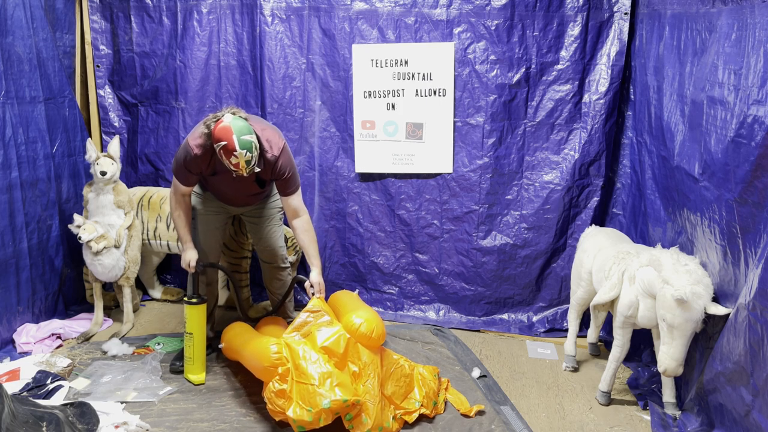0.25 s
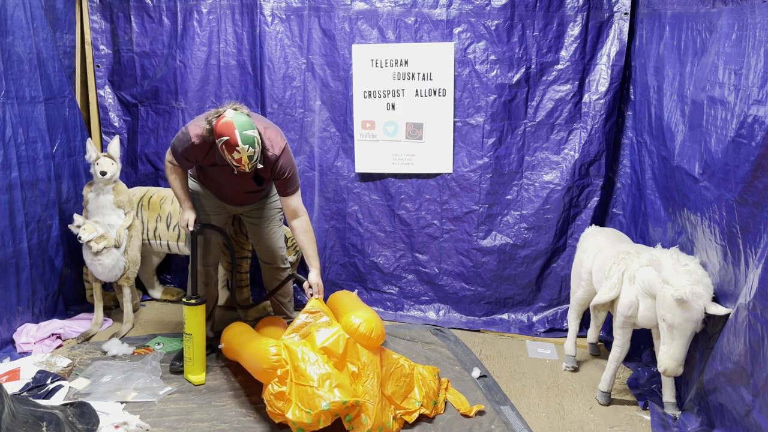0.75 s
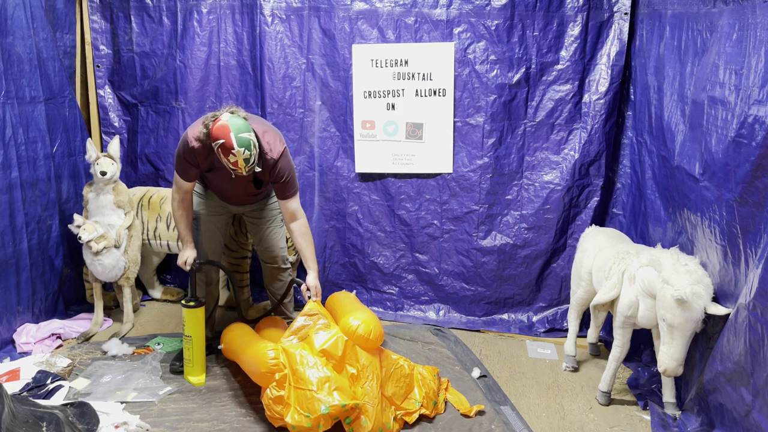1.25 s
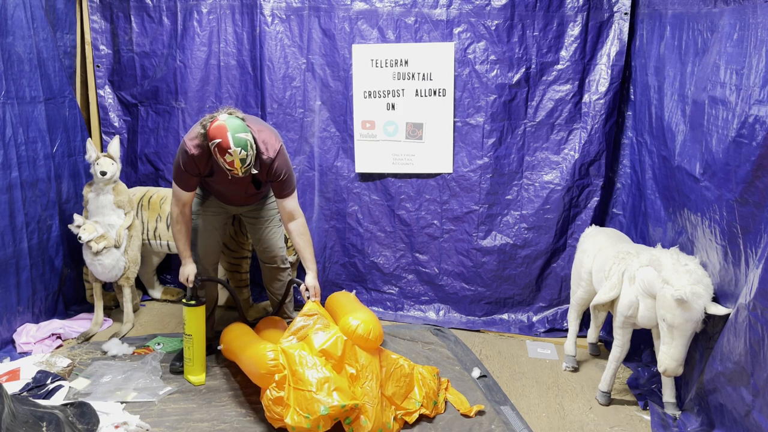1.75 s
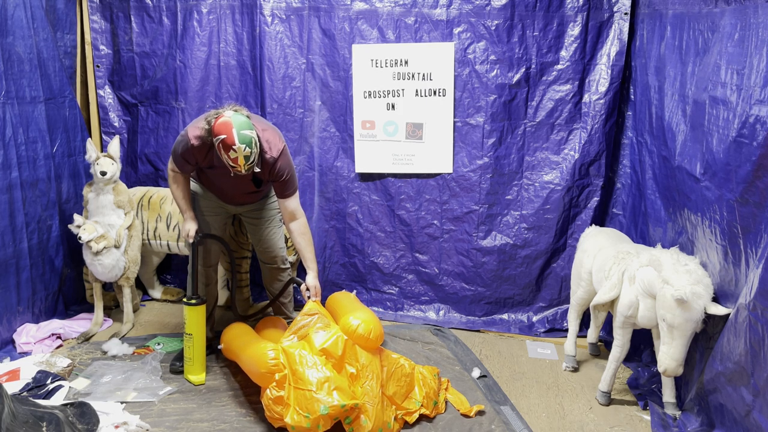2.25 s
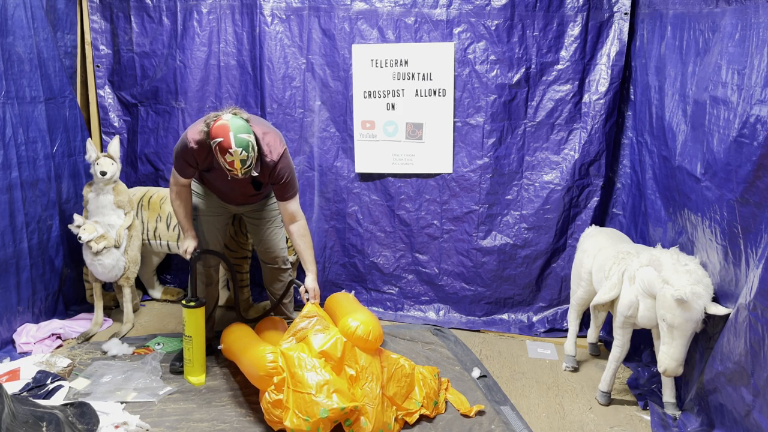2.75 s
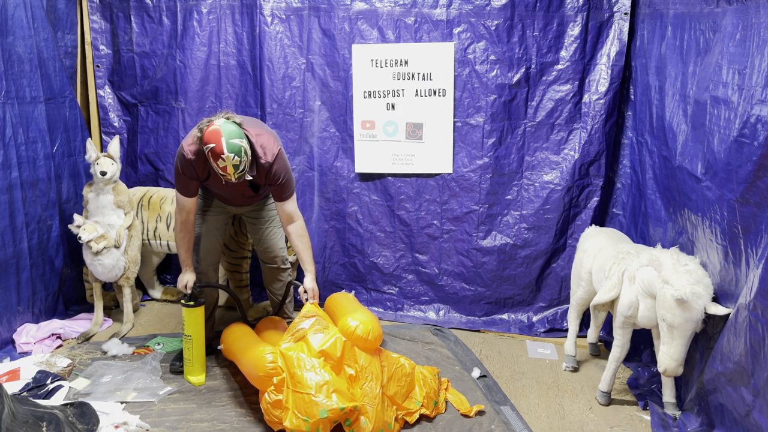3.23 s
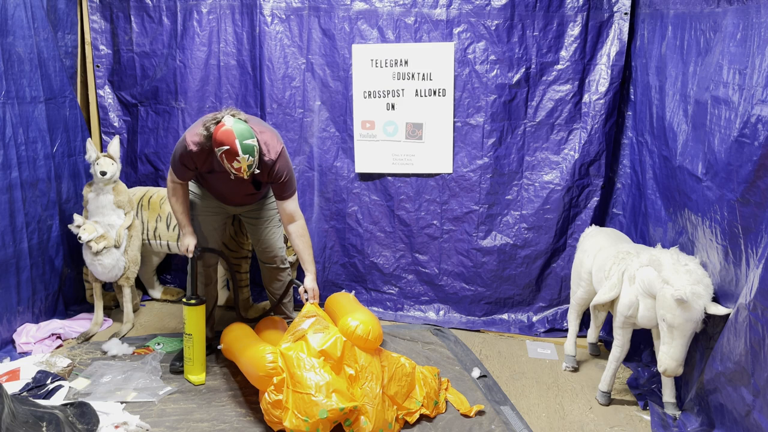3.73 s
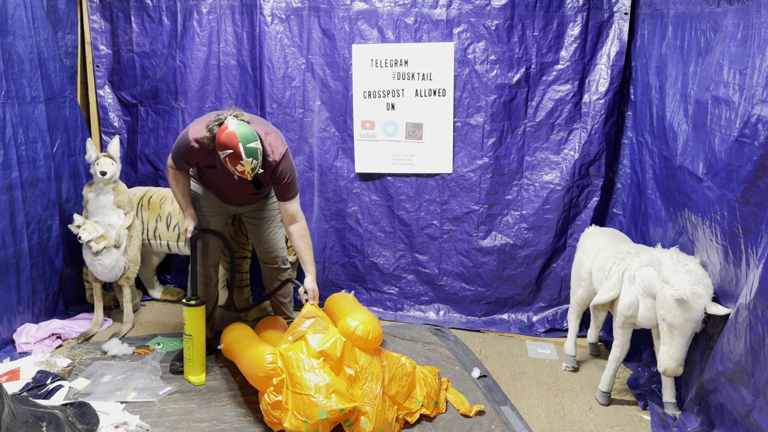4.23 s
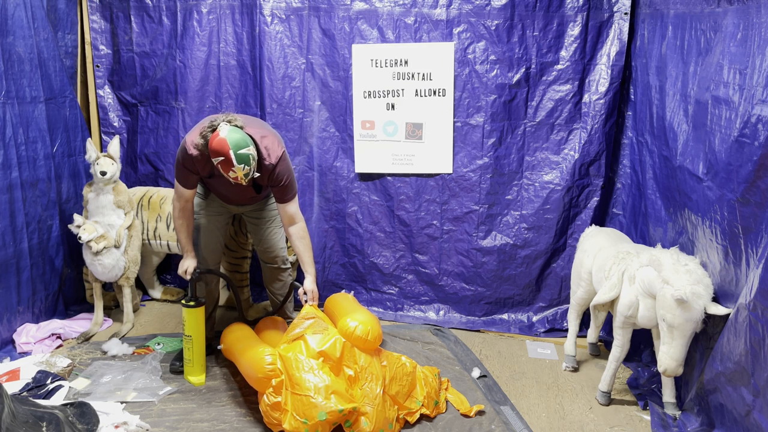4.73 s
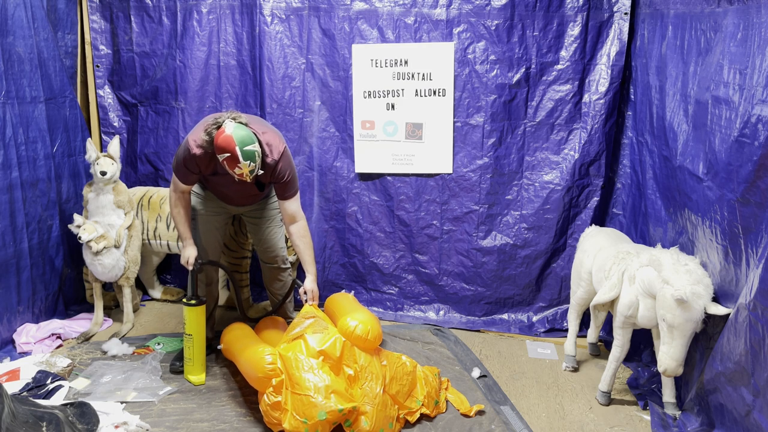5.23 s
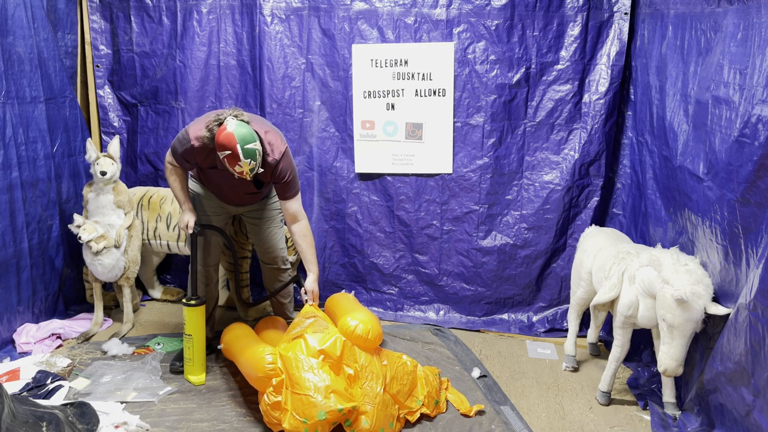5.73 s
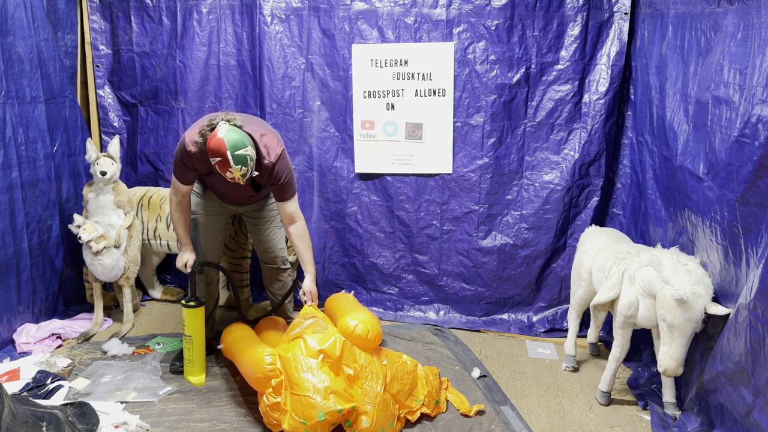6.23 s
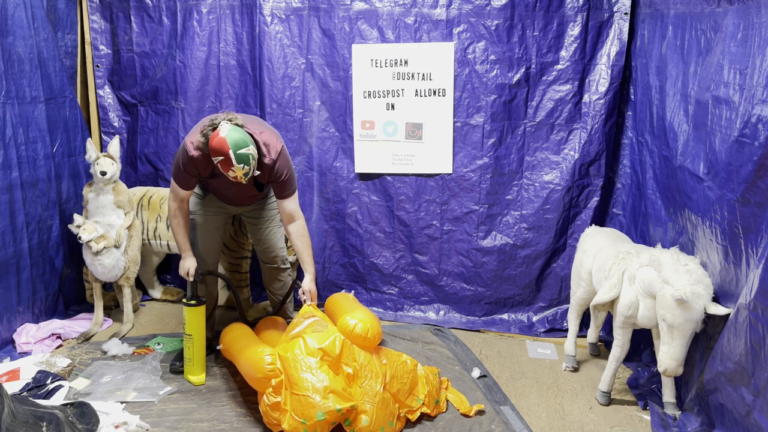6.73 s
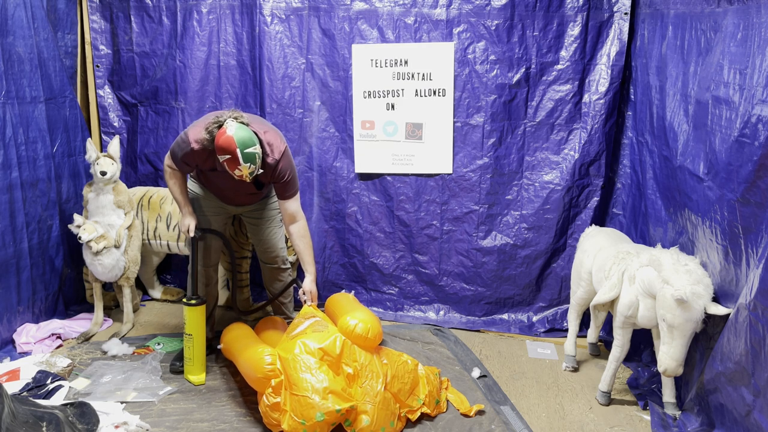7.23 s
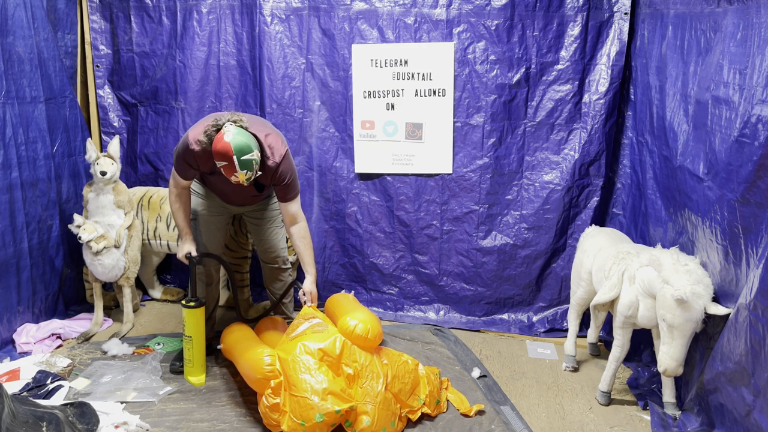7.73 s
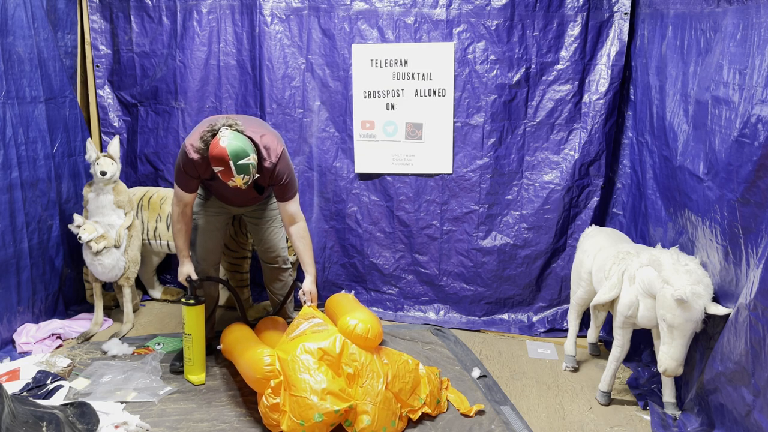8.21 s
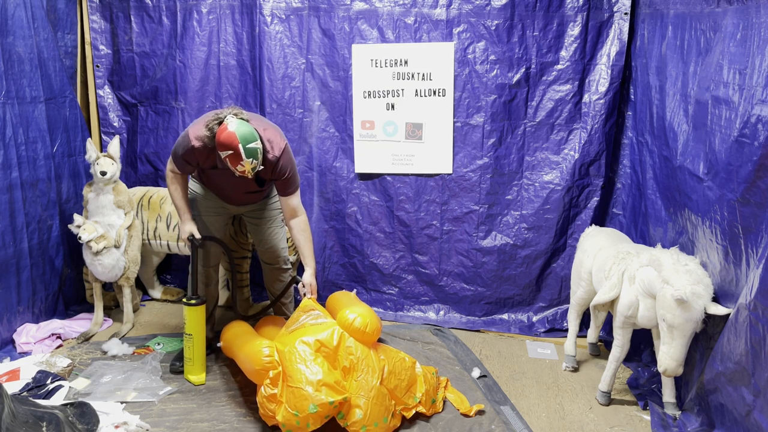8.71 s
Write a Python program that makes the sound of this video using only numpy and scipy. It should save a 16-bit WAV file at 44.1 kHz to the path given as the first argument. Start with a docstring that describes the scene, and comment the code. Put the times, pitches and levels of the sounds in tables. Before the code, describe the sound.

A hand pump works in steady strokes, loud airy hisses on the pulls alternating with softer puffs on the pushes, with one dull bottom knock.

```python
"""A double-action hand pump fills a vinyl inflatable in a space hung with tarpaulin.
First a push dies away; then pulls and pushes take turns, and the sound ends during the sixth pull.
Air noise hisses through the valves and rings in rod and hose; the barrel's tone glides down on pulls, up on pushes.
As the handle turns at the top there is a soft bump, and a valve flap flutters as the push starts.
Near the end of the second full push the piston knocks on the bottom. Low rumble and faint hiss lie behind it all."""
import sys
import numpy as np
from scipy import signal
from scipy.fft import rfft, irfft, next_fast_len
from scipy.io import wavfile
from scipy.ndimage import uniform_filter1d

SR = 44100
rng = np.random.default_rng(int(sys.argv[2]) if len(sys.argv) > 2 else 0)


def store_pcm(level_fs):
    """Save levels as 16-bit WAV."""
    pcm = np.round(np.clip(level_fs, -1, 1) * 32767).astype(np.int16)
    wavfile.write(sys.argv[1], SR, np.atleast_2d(pcm).T)


N = 395577
TIME = np.arange(N) / SR
PADDED = next_fast_len(N + SR)  # room for echoes to ring out
HZ = np.maximum(np.arange(PADDED // 2 + 1) * SR / PADDED, 1)


# Strokes of the pump handle; the first push is already dying away at the start.
# Each row: start in seconds, length in seconds, strength of the air jet in dB before shaping and mixing,
# time to full speed in seconds, loss as the arm tires in dB per second.
PULL_STROKES = [(0.109, .83, -20.7, .18, 4), (1.753, .825, -20.9, .185, 6), (3.415, .86, -18.6, .21, 9.5),
                (5.083, .8, -18.8, .28, 9.7), (6.7, .8, -19.6, .22, 9.2), (8.307, .83, -18.7, .26, 11.5)]
PUSH_STROKES = [(-.76, .79, -28, .02, 6), (0.959, .77, -25.9, .17, 10.5), (2.6, .785, -28.6, .01, 4.3),
                (4.296, .76, -27.8, .01, 7.3), (5.888, .78, -27.3, .01, 10),
                (7.527, .695, -27.4, .015, 4.8)]
VALVE_S = .01  # a valve takes this long to open or shut


def flow(strokes, opening_db, brake_s, brake_db):
    """Jet strength: the valve opens, the piston gathers speed, the arm tires and brakes, the valve shuts."""
    strength = np.zeros(N)
    opening = from_db(opening_db)
    for start, length, db, attack_s, tiring_db_per_s in strokes:
        age = np.maximum(TIME - start, 0)
        inside = np.minimum(TIME - start, start + length - TIME)
        valve = np.clip(inside / VALVE_S + .5, 0, 1)
        gathering = np.sin(np.pi / 2 * np.minimum(age / attack_s, 1))
        speed = opening + (1 - opening) * gathering
        braking = np.clip(1 + (age - length) / brake_s, 0, 1) ** 2  # ever harder
        level_db = db - tiring_db_per_s * age - brake_db * braking
        strength += valve * speed * from_db(level_db)
    return strength


def piston_height(pull_ease, push_ease):
    """0 at the bottom, 1 at the top; each stroke starts briskly and slows towards its end."""
    def travel(strokes, ease):
        """Count the strokes done so far, including the part of the present one."""
        done = np.zeros(N)
        for start, length, *_ in strokes:
            progress = np.clip((TIME - start) / length, 0, 1)
            done += 1 - (1 - progress) ** ease
        return done

    return 1 + travel(PULL_STROKES, pull_ease) - travel(PUSH_STROKES, push_ease)


def barrel(x, height, bottom_hz, top_hz, echo):
    """Sound bounces between piston and end cap, so its comb of resonances slides with the piston."""
    bottom_trip, top_trip = SR / bottom_hz, SR / top_hz  # round trips in samples
    trip = bottom_trip + (top_trip - bottom_trip) * height
    at = np.arange(N)
    band = butter(x, [1400, 5200], "band", order=1)
    out = x
    for bounce in (1, 2):
        out = out + echo ** bounce * np.interp(at - bounce * trip, at, band)
    return out


# Fixed resonances of hose and rod.
# Each row: frequency in Hz, width in Hz, lift in dB (overlapping lifts add up).
PIPE_RESONANCES = [(64, 24, 15), (130, 24, 5), (185, 18, 3), (320, 60, 5), (590, 80, 4.5), (829, 70, 7),
                   (1119, 90, 5.5), (1428, 40, 4.5), (1570, 130, 4.5), (1970, 80, 6), (2405, 70, 5.5),
                   (2635, 55, 3.5), (2810, 130, 3.5), (3020, 120, 6), (3360, 130, 6.5), (3773, 130, 7),
                   (4160, 140, 5.5), (4556, 160, 7), (4925, 160, 5.5), (5250, 120, 5), (5600, 180, 6),
                   (5900, 200, 3), (6222, 76, 3.5), (6480, 130, 3.5), (6784, 128, 3), (7437, 190, 7.5),
                   (7832, 190, 6.5), (8213, 156, 5.5), (9085, 190, 7.5), (9880, 200, 7)]


def turbulence(height):
    """Noise from the valves rings in barrel, rod and hose."""
    noise = butter(rng.standard_normal(N), 43, "high")
    jet = barrel(noise, height, bottom_hz=711, top_hz=474, echo=.2)
    pipe_db = sum(db / (1 + (2 * (HZ - hz) / width) ** 2) for hz, width, db in PIPE_RESONANCES)
    return coloured(jet, from_db(pipe_db))


# Tone colour of the valve hiss on the pull and on the push; only the shape counts.
# Each row: frequency in Hz, relative strength per Hz in dB.
PULL_HISS_COLOUR = [(150, -18.5), (450, -17), (1000, -14.5), (1800, -8.5), (2800, 1.5), (3900, -5),
                    (5600, -3.5), (6600, -3), (7400, -15.5), (8600, -17), (10000, -14.5), (11300, -7.5),
                    (11900, -53), (14000, -19)]
PUSH_HISS_COLOUR = [(150, -9.5), (450, -13.5), (1000, -10.5), (1800, -5.5), (2800, 2), (3900, -5.5),
                    (5600, -6.5), (6600, -3), (7400, -16.5), (8600, -13), (10000, -12.5), (11300, -3),
                    (11800, -30.5), (13000, -17), (13600, -73)]


def hiss(jet, strength, colour, full_db, low_power, high_power, split_hz, gusty_db):
    """One valve's rush; a slow jet is duller, as its highs fade faster than its lows."""
    air = rms_one(coloured(jet, from_db(at_hz(colour))))
    low = coloured(air, 1 / (1 + (HZ / split_hz) ** 4))
    high = air - low
    effort = strength / from_db(full_db)
    gusts = from_db(gusty_db * drift(45))
    return from_db(full_db) * gusts * (low * effort ** low_power + high * effort ** high_power)


# Fluttering of the valve flap as a push starts.
# Each row: start in seconds, length in seconds, average beats per second in Hz, level in dB before the swell.
FLAP_FLUTTERS = [(0.955, .09, 66, -29.5), (2.617, 0.064, 64.5, -28), (4.312, 0.077, 64, -31),
                 (5.885, 0.1, 67.6, -28.5), (7.544, .08, 64, -29.5)]


def flutter(overtone_db, rattle_db):
    """The flap beats strongly for a few cycles until the air holds it open; a very faint trace remains."""
    out = np.zeros(N)
    wobble = 1 + 0.12 * drift(47)  # uneven beating
    rattle = from_db(rattle_db) * rms_one(butter(rng.standard_normal(N), [30, 190], "band"))
    for start, length, hz, db in FLAP_FLUTTERS:
        swell = np.interp((TIME - start) / length, [0, .12, .6, .88, 1.05], [0, 0.84, 0.69, 0.98, 0.0086])
        phase = 2 * np.pi * hz * np.cumsum(wobble * (TIME > start)) / SR
        beat = np.sqrt(2) * np.sin(phase)
        overtone = from_db(overtone_db) * np.sin(2 * phase)
        out += from_db(db) * swell * (beat + overtone + rattle)
    return out


# The piston hits the bottom and the pump settles.
# Each row: time in seconds, force in dB before filtering, contact corner in Hz (lower means softer).
BOTTOM_KNOCKS = [(3.306, -13, 800), (3.324, -23, 450), (3.351, 1, 70), (3.361, -4, 60)]
# Ringing tones of pump and floor.
# Each row: frequency in Hz, relative level in dB, time to fade by 60 dB in seconds.
BODY_MODES = [(64, -18.5, .35), (131.5, -9, 0.16), (184.7, -6.5, 0.24), (258, -11, 0.19), (275, -5, 0.091),
              (312, 0, 0.1), (380, -4, 0.064), (440, -12, 0.087), (473, -12, .07), (576, -17, 0.06),
              (950, -15, .04), (1440, -5, .05)]


def knocks(clatter_db, clatter_s):
    """Soft contacts set the pump and the floor ringing; the first also makes the plastic clatter."""
    force = np.zeros(N)
    for start, db, corner_hz in BOTTOM_KNOCKS:
        click = from_db(db) * (np.arange(N) == round(start * SR))
        force += butter(click, corner_hz, "low")
    body = np.zeros(N)
    for k, (hz, db, t60) in enumerate(BODY_MODES):
        body += from_db(db) * (-1) ** k * ring(force, hz, t60)  # neighbours swing opposite ways
    first_s = BOTTOM_KNOCKS[0][0]
    return body + from_db(clatter_db) * burst(first_s, clatter_s, band_hz=[450, 1700])


# Soft bumps as the handle turns at the top.
# Each row: start in seconds, starting level in dB before the room.
TURN_BUMPS = [(0.911, -42), (2.555, -50), (4.245, -44.5), (5.845, -49), (7.486, -48)]


def bumps(decay_s):
    """The rod shifts in its guide with a dull, brief rub."""
    return sum(from_db(db) * burst(start, decay_s, band_hz=[110, 480]) for start, db in TURN_BUMPS)


def burst(start, decay_s, band_hz):
    """A sudden patch of noise that dies away, starting at about unit power."""
    fading = (TIME > start) * np.exp(-np.abs(TIME - start) / decay_s)
    white = rng.standard_normal(N) * fading
    make_up = np.sqrt(SR / 2 / (band_hz[1] - band_hz[0]))  # power lost outside the band
    return butter(white, band_hz, "band", order=3) * make_up


def ring(x, hz, t60):
    """A unit click sets a sine ringing, starting from a height of about 1."""
    r = from_db(-60 / (t60 * SR))  # shrink per sample
    w = 2 * np.pi * hz / SR
    return signal.lfilter([0, np.sin(w)], [1, -2 * r * np.cos(w), r * r], x)


ROOM_T60_S = .17  # echoes fade by 60 dB in this time


def reflections(x):
    """Two unrelated spectra of dense echoes that die quickly: finely rippled, but even in overall colour."""
    fading = from_db(-60 * TIME / ROOM_T60_S) * (TIME > .002)
    echoes = rfft(rng.standard_normal((2, N)) * fading, PADDED)
    power = uniform_filter1d(np.abs(echoes) ** 2, size=round(400 * PADDED / SR))  # smoothed over 400 Hz
    return rfft(x, PADDED) * echoes / np.sqrt(power)


# How alike the echoes and the background are at the two microphones.
# Each row: frequency in Hz, correlation (0 is unrelated, 1 is the same).
MIC_LIKENESS = [(60, 0.85), (250, 0.66), (600, 0.1), (1200, 0.017), (6500, .05), (8000, 0.94), (9200, 0.34)]


def pair(mid, side):
    """Two unrelated spectra become left and right, most alike in the bass and part of the treble."""
    alike = at_hz(MIC_LIKENESS)
    shared = np.sqrt(1 + alike) * mid
    opposed = np.sqrt(1 - alike) * side * [[1], [-1]]
    return (shared + opposed) / np.sqrt(2)


# Balance between the sides, shared half and half between them.
# Each row: frequency in Hz, left minus right in dB.
SIDE_BALANCE = [(100, 1), (450, -1), (800, 5), (1400, 1.5), (2100, -2), (3000, 3.5), (4200, 2), (5800, 7.5),
                (7000, 2), (8600, 0)]
TARPAULIN_HZ, MIC_LAG_S = 377, .00014


def room(x, height, wet_db):
    """Arm and hose move with the piston and change the echoes; direct sound reaches the left microphone first."""
    turn = height * np.pi / 2  # blends two sets of echoes
    mid, side = reflections(x * np.cos(turn)) + reflections(x * np.sin(turn))
    echoes = pair(mid, side)
    wet = from_db(wet_db) * HZ ** 2 / (HZ ** 2 + TARPAULIN_HZ ** 2)  # bass passes through the thin sheets
    direct = rfft(x, PADDED)
    lag = np.exp(-2j * np.pi * np.minimum(HZ * MIC_LAG_S, 1))  # never more than one whole cycle
    both = (np.array([direct, direct * lag]) + wet * echoes) / np.sqrt(1 + wet ** 2)
    sides = from_db(at_hz(SIDE_BALANCE) * [[.5], [-.5]])
    return irfft(both * sides, PADDED)[:, :N]


# Tone colour of the background; only the shape counts.
# Each row: frequency in Hz, relative strength per Hz in dB.
BACKGROUND_COLOUR = [(20, -16), (42, -7), (64, 5), (95, -9.5), (130, -6.5), (220, -10), (330, -12),
                     (500, -18.5), (1200, -22), (2600, -26), (7000, -26.5), (12000, -42)]


def ambience(level_db):
    """Steady low rumble with a faint hiss, made of coloured noise."""
    noise = pair(*rfft(rng.standard_normal((2, N)), PADDED))
    shaped = irfft(noise * from_db(at_hz(BACKGROUND_COLOUR)), PADDED)[:, :N]
    return from_db(level_db) * rms_one(shaped)


def from_db(db):
    """Decibels to gain."""
    return 10 ** (np.asarray(db) / 20)


def rms_one(x):
    """Scale to unit power."""
    return x / np.sqrt(np.mean(x ** 2) + 1e-20)


def at_hz(points):
    """A table joined by straight lines over log frequency."""
    hz, value = np.transpose(points)
    return np.interp(np.log(HZ), np.log(hz), value)


def coloured(x, gain):
    """Apply a gain per frequency."""
    return irfft(rfft(x, PADDED) * gain, PADDED)[..., :N]


def butter(x, hz, kind, order=2):
    """Smooth filter that keeps the lows, the highs or a band (Butterworth)."""
    return signal.sosfilt(signal.butter(order, hz, kind, fs=SR, output="sos"), x)


def drift(rate):
    """Random wandering of unit power, with a new target `rate` times a second."""
    knots = rng.standard_normal(size=4000)
    return rms_one(np.interp(TIME * rate, np.arange(len(knots)), knots))


def scene():
    """Pump and background at the two microphones."""
    height = piston_height(pull_ease=1.3, push_ease=1.37)
    jet = turbulence(height)
    # the jet jumps to opening_db below full speed; the brake acts over the last part of a stroke
    pull_flow = flow(PULL_STROKES, opening_db=-23, brake_s=.235, brake_db=38)
    push_flow = flow(PUSH_STROKES, opening_db=-4, brake_s=.215, brake_db=26)
    pull = hiss(jet, pull_flow, PULL_HISS_COLOUR, full_db=-18.5, low_power=0.67, high_power=1.096,
                split_hz=2400, gusty_db=0.72)
    push = hiss(jet, push_flow, PUSH_HISS_COLOUR, full_db=-28, low_power=0.54, high_power=1.12,
                split_hz=1820, gusty_db=0.7)
    air = from_db(4.5) * (pull + push)
    thuds = bumps(decay_s=0.037) + knocks(clatter_db=-27, clatter_s=0.025)
    flap = flutter(overtone_db=-7.5, rattle_db=-12.5)  # equal on both sides, without echoes
    pump = room(air, height, wet_db=3.5) + room(thuds, height, wet_db=-4) + flap
    return pump + ambience(level_db=-49)


def record(dry):
    """The treble is cut steeply above 13200 Hz."""
    return signal.sosfilt(signal.ellip(10, .2, 80, 13200, fs=SR, output="sos"), dry)


dry = scene()
out = record(dry)
store_pcm(out)
```